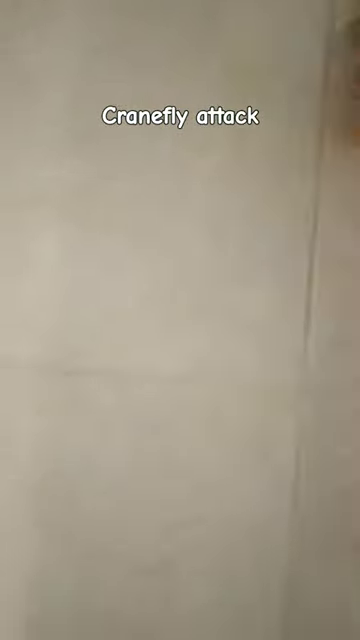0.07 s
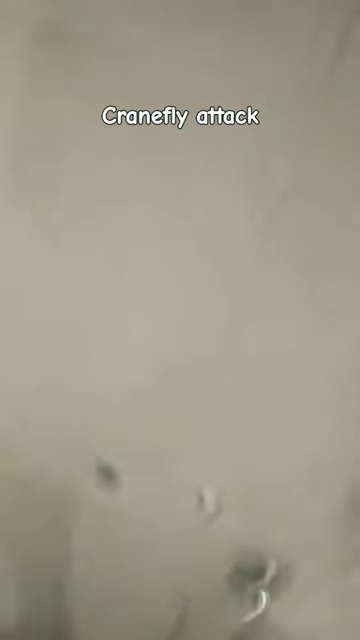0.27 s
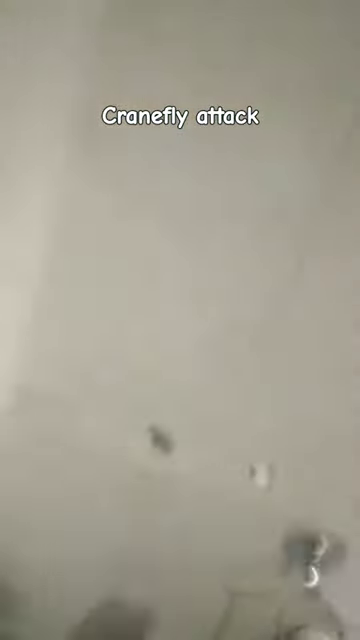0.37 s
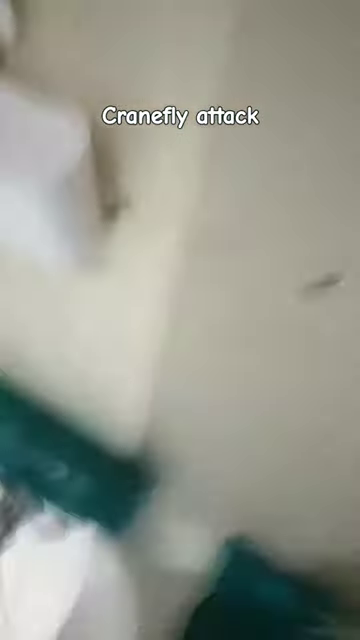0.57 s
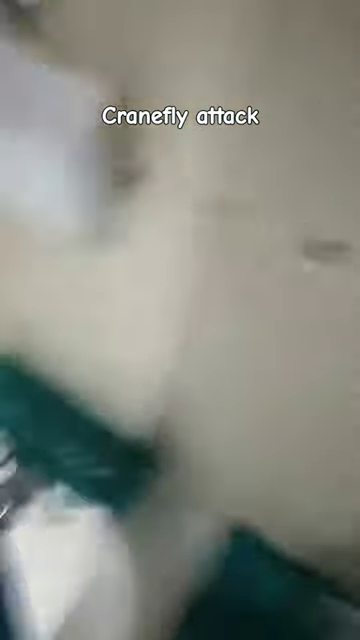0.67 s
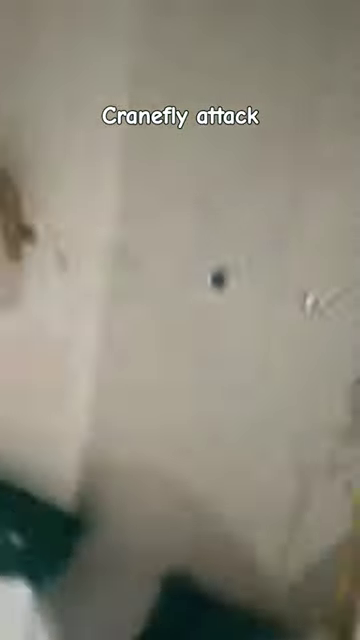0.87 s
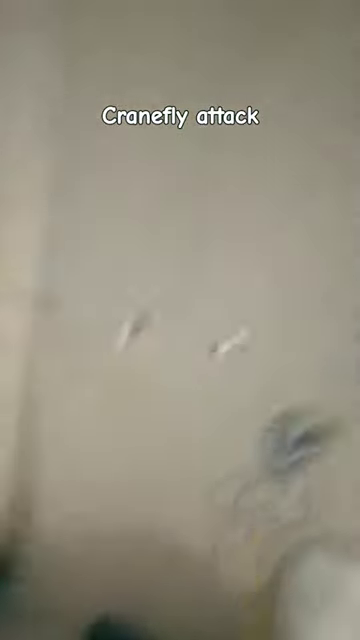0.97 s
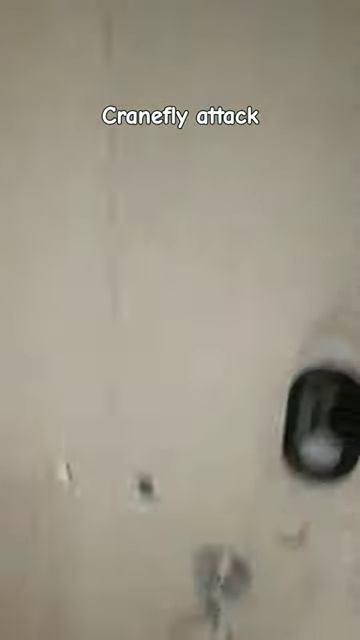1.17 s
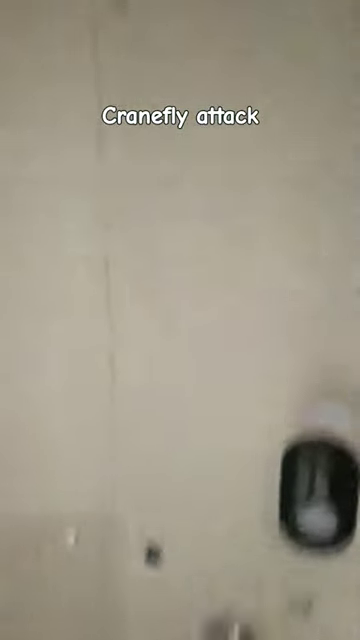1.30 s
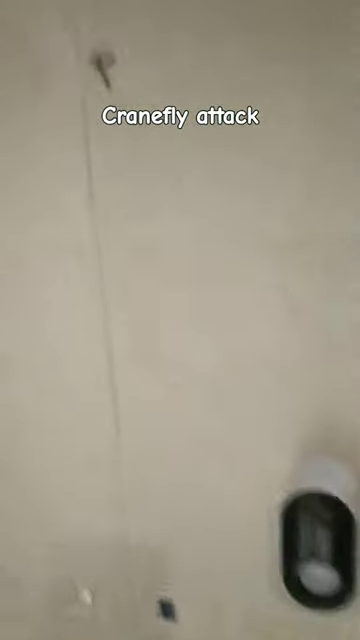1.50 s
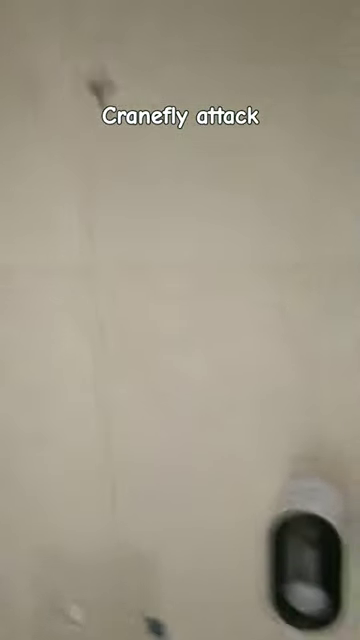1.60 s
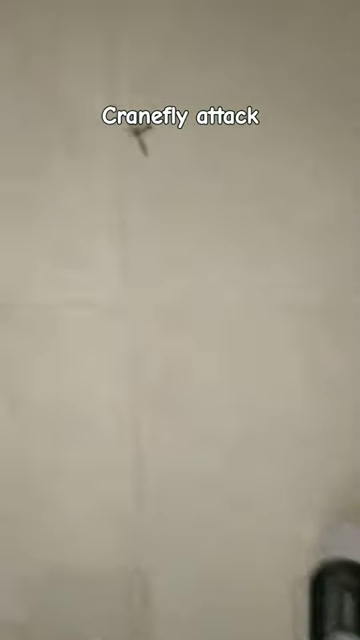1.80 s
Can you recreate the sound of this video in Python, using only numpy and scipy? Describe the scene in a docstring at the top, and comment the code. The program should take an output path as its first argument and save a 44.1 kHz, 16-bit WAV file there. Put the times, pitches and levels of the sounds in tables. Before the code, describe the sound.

One hard swat on a tiled floor rings briefly in a small bathroom.

```python
"""One hard swat on the tiled floor of a small bathroom, close to a hand-held phone.
Over a low room rumble, cloth rustles as the arm swings. At 0.24 s the swatter lands with a crack;
the floor thumps, the tiles reflect the slap, the room booms in its low modes and air moves past
the phone. As the arm draws back, the sleeve brushes the phone and the body shuffles, with a few
faint ticks. Near 1.2 s the slide of the cloth ends in a thin rubbing note, and the rumble remains."""
import sys
import numpy as np
from scipy import signal
from scipy.fft import rfft, irfft
from scipy.io import wavfile

SR = 44100
rng = np.random.default_rng(int(sys.argv[2]) if len(sys.argv) > 2 else 0)


def generate_wav(sig):
    """Save sig (samples, or channels by samples) to the path in sys.argv[1] as 16-bit PCM at SR."""
    pcm = np.round(np.clip(np.atleast_2d(sig).T, -1, 1) * 32767).astype(np.int16)
    wavfile.write(sys.argv[1], SR, pcm)


N = 81585

SWAT_S = .2408
CLOTH_PAN_DB = 4.5  # left minus right, as is every pan
T60_PER_DECAY = np.log(1000)  # time constants in a fall of 60 dB

# Contacts as the swatter lands flat (delay [s], level [dB], time constant [s])
CONTACTS = [(0, -12, .0005), (.0005, -9, 0.0011), (.0042, -20.5, .003)]
# Spectrum of the contact noise (frequency [Hz], relative density [dB])
CRACK_SPECTRUM = [(150, -10), (400, 2), (900, -8), (1600, -0.5), (2300, -4), (3400, 1.5), (5000, -9.5),
                  (7200, -6.5), (10000, -10.5), (13000, -16), (15500, -20)]
# Natural modes of the swatter (frequency [Hz], level [dB], T60 [s])
SWATTER_MODES = [(590, -20, .06), (1653, -22, .012), (3328, -16, .012), (3855, -17.5, 0.021),
                 (7320, -14, .009)]
# Bands of the diffuse field (frequency [Hz], relative density [dB], T60 [s])
REVERB_BANDS = [(60, -12.5, .55), (120, -7.5, .5), (220, -7.5, 0.88), (322.6, -1, 0.65), (620, -2, .41),
                (1000, -13, .37), (1700, -7, .3), (2600, -12.5, .28), (3826, -9, .27), (5270, -10.5, 0.25),
                (7180, -11, 0.24), (10700, -18.5, 0.16), (13000, -29, .24), (15500, -31, .13)]
# Balance of the diffuse field between the microphones (frequency [Hz], pan [dB])
REVERB_PAN = [(60, -1), (150, -2), (400, 1.5), (1300, 3), (2400, 2), (8000, 3), (11000, -4), (15000, -3.5)]
# The floor giving under the blow (frequency [Hz], relative level [dB], T60 [s])
FLOOR_THUMP = (117, -6.5, 0.26)
# Standing waves of the room (frequency [Hz], relative level [dB], T60 [s], pan [dB])
ROOM_MODES = [(81.53, -19, .62, 2.5), (97.97, -9.5, 0.51, 0), (119.23, -7.5, .44, -2.5),
              (130, -10.5, .38, -2), (155.7, -17, .43, -1.5), (193.7, -17, .45, -4.5),
              (269, -14.5, 0.35, 0.5), (269, -24.5, 0.67, 2.5), (291.2, -18.5, 0.29, -.5),
              (351.5, -28.5, 0.54, -5), (410, -34, .32, 3), (443.7, -27.5, 0.31, 5.5), (531, -36, .39, 4.5),
              (603.6, -35, .44, 1)]
# Envelope of the sleeve's rustle (time [s], level [dB])
RUSTLE_LEVEL = [(.1, -84), (.14, -67.5), (.21, -58), (.4, -59), (.54, -61.5), (.59, -63.5), (.6, -72),
                (.66, -57.5), (.76, -61.5), (.85, -59), (.92, -57.5), (1.04, -55.5), (1.13, -52.5),
                (1.19, -59.5), (1.243, -64), (1.256, -89)]
# Spectrum of the rustle (frequency [Hz], relative density [dB])
RUSTLE_SPECTRUM = [(200, -2.5), (400, -3), (800, -11), (1400, -6), (2000, -3), (2400, 0), (3000, -3),
                   (4000, -2.5), (5300, -6.5), (7200, -2.5), (8500, -10.5), (10500, -12.5), (12500, -24),
                   (15500, -26.5)]
# Brush of cloth near the phone (start [s], length [s], level [dB], pan [dB])
BRUSHES = [(0.639, 0.052, -58.5, -13.5)]
# Spectrum of the brush (frequency [Hz], relative density [dB])
BRUSH_SPECTRUM = [(500, 4.5), (1500, -6.5), (3000, 3), (5000, -3.5), (7000, -2), (8800, -4.5), (10000, 1.5),
                  (12000, -10), (15000, -10)]
# Envelope of the rubbing note (time [s], level [dB])
SQUEAK_LEVEL = [(1.0, -120), (1.11, -65.5), (1.235, -65), (1.28, -120)]
# Ticks and scuffs (start [s], centre [Hz], half-width [octaves], level [dB], time constant [s])
TICKS = [(.199, 7170, .22, -45.5, 0.0024), (.642, 9650, .06, -52, 0.0065), (.828, 2700, .6, -53.5, 0.025),
         (1.134, 9000, 0.37, -45, 0.0021), (1.158, 1200, 0.2, -53, 0.021), (1.155, 500, 0.37, -60, .025),
         (1.203, 380, .3, -55, .015), (1.58, 4700, 0.26, -75, .003)]
# Envelope of the body's shuffling (time [s], level [dB])
SHUFFLE_LEVEL = [(0, -68.5), (.6, -63.5), (.85, -59.5), (1.05, -62), (1.18, -56.5), (1.3, -64),
                 (1.5, -66.5), (1.62, -67.5), (1.85, -70)]
# Spectrum of the shuffling (frequency [Hz], relative density [dB])
SHUFFLE_SPECTRUM = [(70, -8), (160, -5), (220, -8.5), (270, 2), (320, -0.5), (420, -2.5), (600, -11.5),
                    (1000, -22.5), (2000, -45.5)]
# Envelope of the air moving past the phone (time [s], level [dB])
DRAUGHT_LEVEL = [(0, -50.5), (.22, -54.5), (.27, -29), (.53, -39.5), (.62, -47.5), (.8, -50), (1.1, -49),
                 (1.4, -56.5), (1.85, -53)]
# Spectrum of the moving air (frequency [Hz], relative density [dB])
DRAUGHT_SPECTRUM = [(6, -7.5), (15, -1.5), (30, -5.5), (50, -16), (100, -25.5), (300, -70.5)]
# Spectrum of the room's rumble (frequency [Hz], relative density [dB])
RUMBLE_SPECTRUM = [(5, -19.5), (25, -10), (60, -5.5), (110, -5.5), (160, -6.5), (210, -8.5), (280, -11.5),
                   (420, -16.5), (600, -19.5), (1200, -36), (3000, -48), (8000, -57), (15000, -63)]


def swatter_crack():
    """Impact excitation: brief contacts radiate noise, ring the swatter and squeeze out a puff of air."""
    t = clock()
    contacts = sum(undb(db) * strike(SWAT_S + delay, .0001, decay) for delay, db, decay in CONTACTS)
    slap = noise(over_bins(CRACK_SPECTRUM))[0] * contacts
    flat_s = SWAT_S + CONTACTS[1][0]
    for hz, db, t60 in SWATTER_MODES:
        envelope = strike(flat_s, .0001, t60 / T60_PER_DECAY)
        slap += undb(db) * np.sin(2 * np.pi * hz * (t - flat_s)) * envelope
    slap -= undb(-10) * np.exp(-((t - flat_s) / .00096) ** 2)  # the puff, a Gaussian pulse
    left = np.interp(t - .0002, t, slap)  # sound reaches the left microphone later
    return np.array([left, slap]) * pan(db=2)


def tile_reverberation():
    """Diffuse field: dense reflections off the tiles decay exponentially, the treble first."""
    spectrum = rfft(noise(over_bins(REVERB_BANDS))) * pan(over_bins(REVERB_PAN))
    log_centres = np.log([hz for hz, _, _ in REVERB_BANDS])
    out = 0
    for selector, (_, _, t60) in zip(np.eye(len(REVERB_BANDS)), REVERB_BANDS):
        triangle = np.interp(np.log(bins()), log_centres, selector)
        band = irfft(spectrum * triangle, N)
        out += band * strike(SWAT_S, rise=.00067, decay=t60 / T60_PER_DECAY)
    return undb(-19.5) * out


def damped_mode(hz, db, t60, phase=0):
    """Free vibration: a mode builds up just after the blow, then decays at its natural frequency."""
    start = SWAT_S + .003
    envelope = strike(start, rise=.0029, decay=t60 / T60_PER_DECAY)
    return undb(db) * np.sin(2 * np.pi * hz * (clock() - start) + phase) * envelope


def room_boom():
    """Resonance: the floor thumps; standing waves ring on, differing in phase at the two microphones."""
    out = -damped_mode(*FLOOR_THUMP)
    half_lag_s = .00012 * np.array([[1], [-1]])
    for k, (hz, db, t60, pan_db) in enumerate(ROOM_MODES):
        phase = (-1) ** k * 2 * np.pi * hz * half_lag_s
        out = out + damped_mode(hz, db, t60, phase) * pan(pan_db)
    low_cut = signal.butter(2, 45, "high", fs=SR, output="sos")
    return undb(.5) * signal.sosfilt(low_cut, out)


def sleeve_rustle():
    """Sliding friction: a sleeve gives off finely grained noise and brushes once past the phone."""
    out = noise(over_bins(RUSTLE_SPECTRUM)) * level_curve(RUSTLE_LEVEL) * pan(CLOTH_PAN_DB)
    attack_s, release_s = .0038, .017
    for start, length, db, pan_db in BRUSHES:
        stroke = np.interp(clock() - start, [0, attack_s, length, length + release_s], [0, 1, 1, 0])
        out += noise(over_bins(BRUSH_SPECTRUM)) * stroke * undb(db) * pan(pan_db)
    grain_db = flutter(rate_hz=250)
    return out * undb(grain_db)


def sleeve_squeak():
    """Narrow-band friction noise: the sliding cloth rubs out a faint note."""
    centre_hz, half_width_hz = 2318, 90
    peak_db = -20 * np.log10(1 + ((bins() - centre_hz) / half_width_hz) ** 2)
    return noise(peak_db) * level_curve(SQUEAK_LEVEL) * pan(CLOTH_PAN_DB)


def ticks():
    """Band-limited transients: each faint tick or scuff is a decaying burst of noise."""
    out = 0
    for start, hz, octaves, db, decay in TICKS:
        peak_db = -20 * np.log10(1 + (np.log2(bins() / hz) / octaves) ** 2)
        out += undb(db) * noise(peak_db) * strike(start, decay / 5, decay)
    return out


def background():
    """Incoherent addition: dull shuffling, air moving past the phone and room rumble sum in power."""
    shuffle = noise(over_bins(SHUFFLE_SPECTRUM)) * level_curve(SHUFFLE_LEVEL)
    draught = noise(over_bins(DRAUGHT_SPECTRUM)) * level_curve(DRAUGHT_LEVEL)
    rumble = noise(over_bins(RUMBLE_SPECTRUM)) * undb(-65.5)
    return shuffle + draught + rumble


def noise(shape_db):
    """Spatial coherence: coloured stereo noise of rms 1, alike in the bass, unrelated in the treble."""
    mid, side = rfft(rng.standard_normal((2, N)))
    spread = bins() / np.hypot(bins(), 900)  # coherence falls away around 900 Hz
    stereo = irfft((mid + spread * side * np.array([[1], [-1]])) * undb(shape_db), N)
    return stereo / stereo.std()


def strike(start, rise, decay):
    """Exponential build-up and damping, with both time constants in seconds."""
    age = np.maximum(clock() - start, 0)
    return (1 - np.exp(-age / rise)) * np.exp(-age / decay)


def flutter(rate_hz):
    """Random modulation with a standard deviation of 1."""
    wander = np.interp(clock() * rate_hz, np.arange(N), rng.standard_normal(N))
    return wander / wander.std()


def level_curve(points):
    """Amplitude envelope through (time [s], level [dB]) points."""
    return undb(np.interp(clock(), *np.array(points).T))


def over_bins(points):
    """Interpolation of a table's decibels along a logarithmic frequency axis."""
    hz, db = np.array(points).T[:2]
    return np.interp(np.log(bins()), np.log(hz), db)


def pan(db):
    """Level difference, split into left and right gains."""
    return undb(np.array([[db], [-db]]).reshape(2, -1) / 2)


def undb(db):
    """Amplitude ratio of a level in decibels."""
    return 10 ** (np.asarray(db) / 20)


def clock():
    """Time of every sample [s]."""
    return np.arange(N) / SR


def bins():
    """Frequency of every Fourier bin [Hz], at least 1."""
    return np.maximum(np.arange(N // 2 + 1) * SR / N, 1)


def scene():
    """Superposition: the swat, the room's response and the small sounds of movement add."""
    swat = swatter_crack() + tile_reverberation() + room_boom()
    return swat + sleeve_rustle() + sleeve_squeak() + ticks() + background()


def record(dry):
    """Saturation and band limiting: the phone rounds the highest peaks and cuts the top treble."""
    ceiling, cutoff_hz = .82, 15600
    rounded = dry / (1 + (np.abs(dry) / ceiling) ** 6) ** (1 / 6)
    return signal.sosfilt(signal.ellip(8, .2, 80, cutoff_hz, fs=SR, output="sos"), rounded)


dry = scene()
out = record(dry)
generate_wav(out)
```